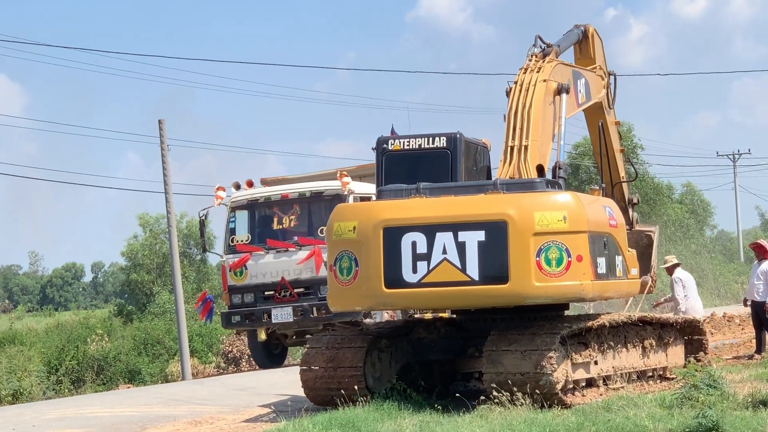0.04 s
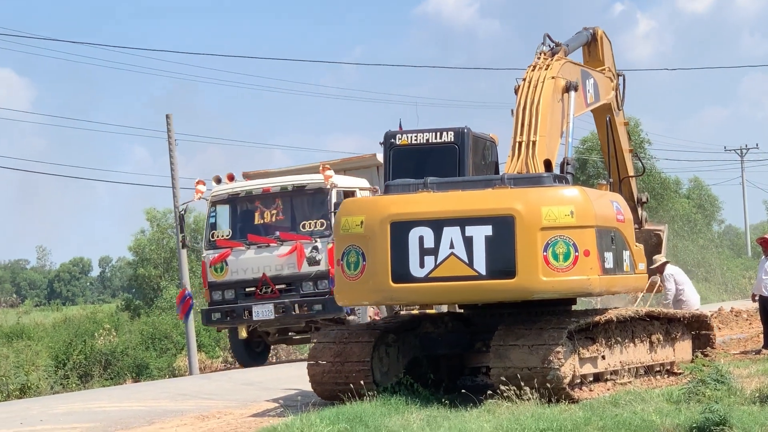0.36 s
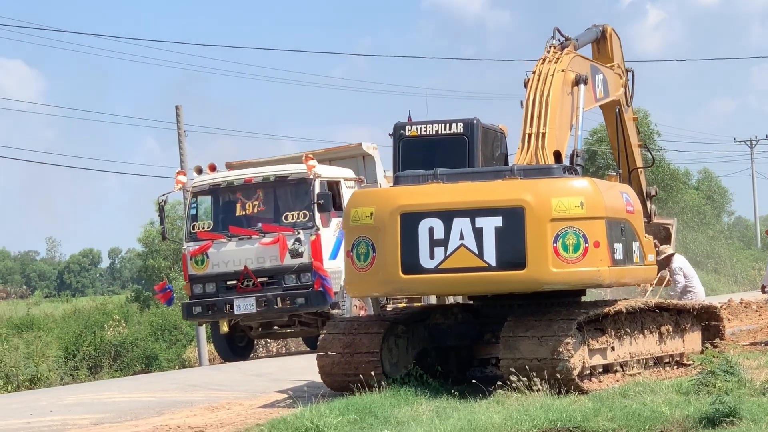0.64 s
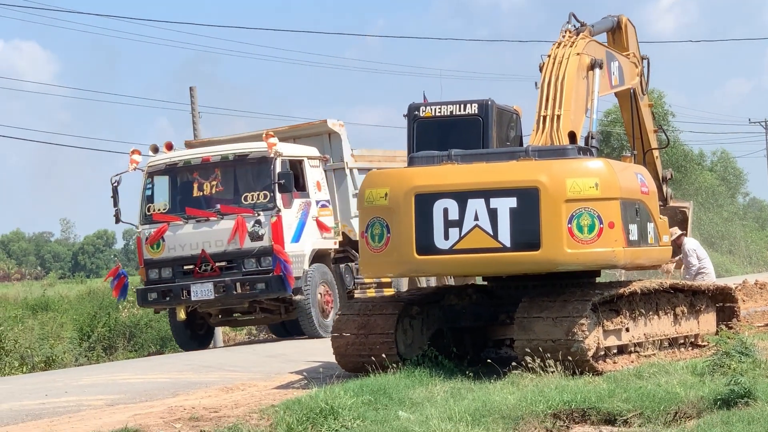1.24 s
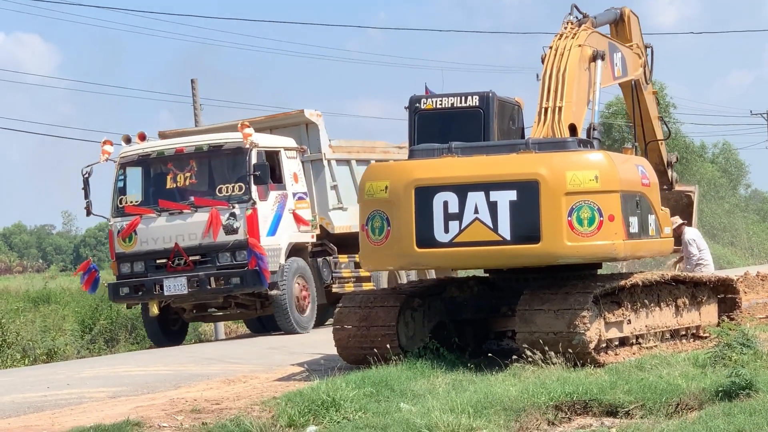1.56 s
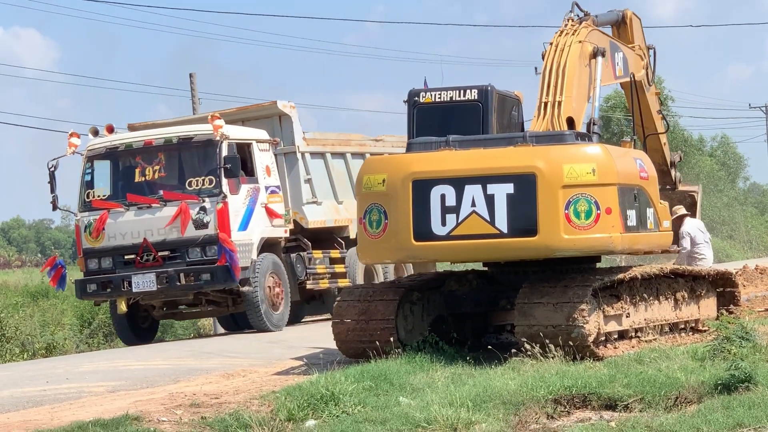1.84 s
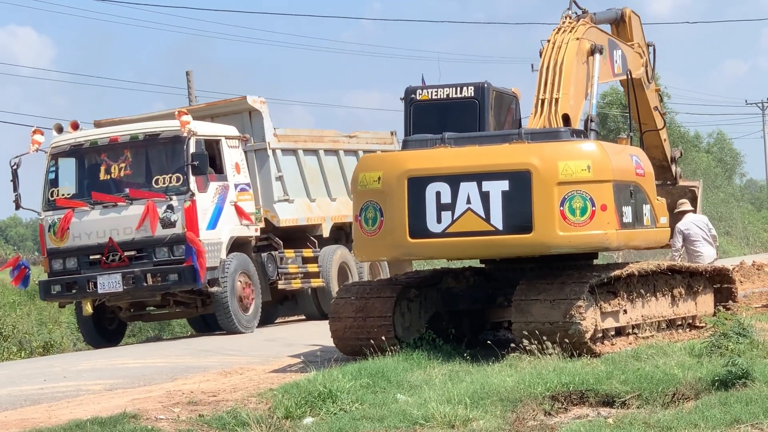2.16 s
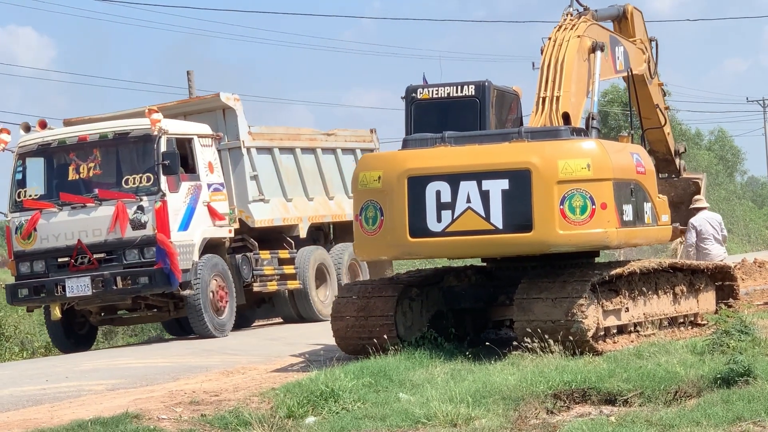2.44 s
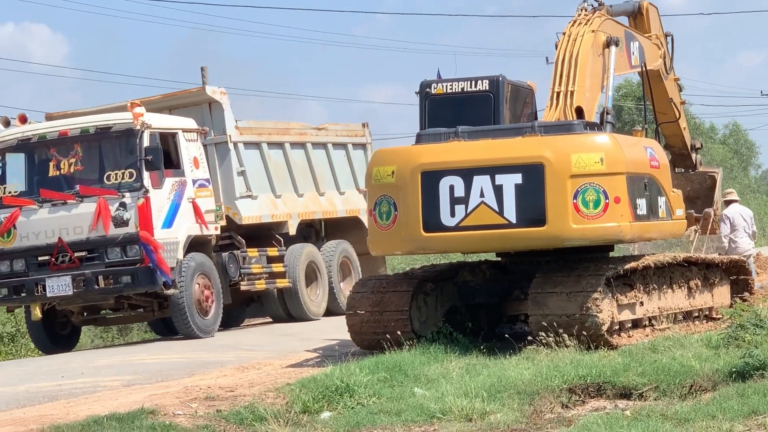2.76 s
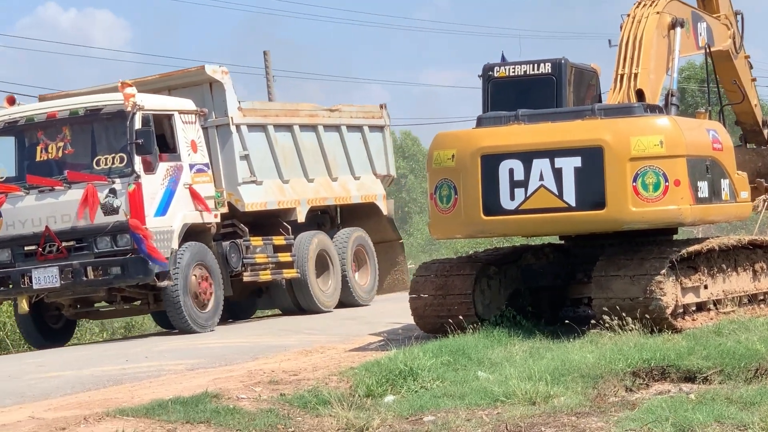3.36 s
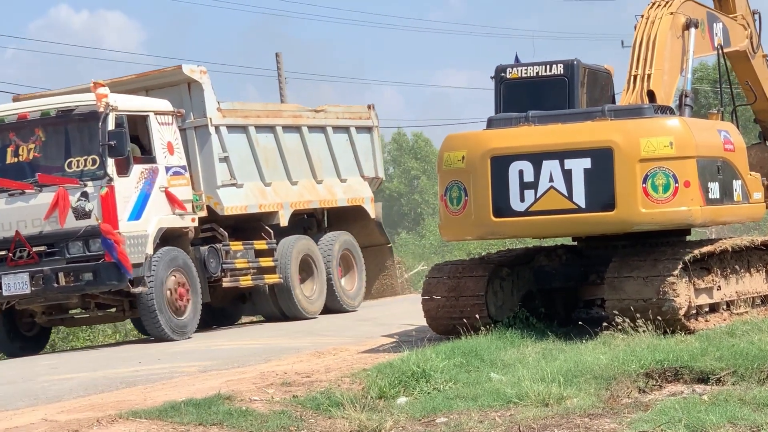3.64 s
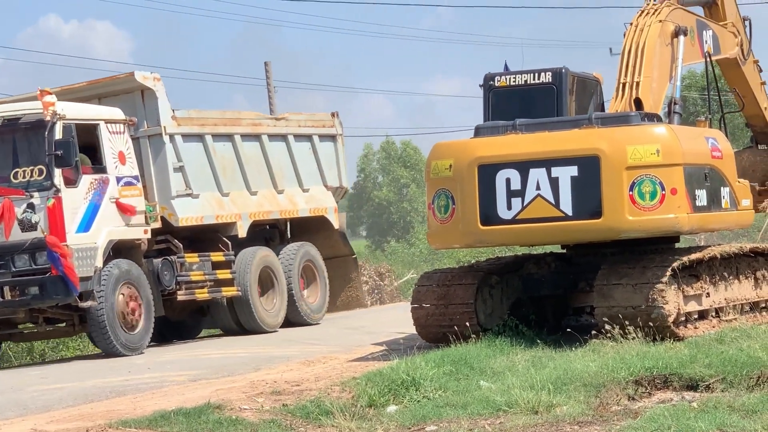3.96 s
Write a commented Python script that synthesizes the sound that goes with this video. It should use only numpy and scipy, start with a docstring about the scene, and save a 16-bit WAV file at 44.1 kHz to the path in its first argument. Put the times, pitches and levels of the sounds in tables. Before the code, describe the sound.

Diesel engines of an excavator and dump truck drone and rumble under a high warbling squeal.

```python
"""A diesel drone and a deep truck rumble come first, with a high, hissy squeal warbling over them.
Two microphones stand by a country road, where an excavator runs at steady revs: its firings drone,
its block clatters, its gears and hydraulics whine. A dump truck crawls along, exhaust puffing and
tyres hissing, and its empty body thumps and rattles. The squeal is probably a dry drive belt."""
import sys
import numpy as np
from scipy import signal
from scipy.fft import rfft, irfft
from scipy.io import wavfile
from scipy.ndimage import uniform_filter1d

SR = 44100
rng = np.random.default_rng(int(sys.argv[2]) if len(sys.argv) > 2 else 0)


def inscribe(sig):
    """Save sig as 16-bit PCM at rate SR to the path in sys.argv[1].

    A 1-D sig is mono; a 2-D sig holds one channel per row.
    Samples are clipped to [-1, 1] before scaling.
    """
    pcm = np.round(np.clip(np.atleast_2d(sig).T, -1, 1) * 32767)
    wavfile.write(sys.argv[1], SR, pcm.astype(np.int16))


N = 176400

# The microphone pair. Each row: frequency in Hz, likeness of the two sides from 0 to 1,
# left over right in dB, left phase lead in radians.
MIC_PAIR = [(30, .75, 4, .3), (60, 0.68, -4.5, 0.2), (120, 0.89, 0, -0.54), (300, 0.89, 0.5, -0.1),
            (497, 0.88, -4.5, 0.54), (665, 0.7, 3.5, -0.2), (790, 0.2, 1, -0.5), (1025, 0.95, -2, -0.23),
            (1320, 1, 0.5, 1.43), (1460, 0.79, 4, 0.47), (1670, 1, -1.2, -0.5), (1953, .9, -0.5, 1),
            (2000, 0.34, 3, 4), (2104, 0.8, 2.5, -0.45), (2430, 0.92, 2, 1.37), (2660, 0.55, -7, 0.1),
            (3050, 0.46, 2, 1.5), (3245, 1, 2.5, 2.5), (3580, 0.26, -2, -0.5), (4500, 0.6, -0.5, 1),
            (4900, 0.8, -5, 0.1), (4980, 0.78, -0.5, 2.5), (6350, 1, -3, 0.65), (7700, 0.48, 3, 4),
            (8180, 0.76, -1, 4), (9800, 0.2, 3.5, 0), (10750, 1, -9, -1), (11750, 1, 1.5, -4),
            (15800, 0.74, -1, 5.5)]

# Excavator revs. Each row: time in seconds, firings per second.
FIRING_RATE = [(0, 88.4), (.7, 91.2), (1.5, 89.7), (2.2, 91), (2.9, 88.3), (3.5, 86.6), (4, 95)]
# Its exhaust tones. Each row: multiple of the crank rate, level in dB against the drone level.
CRANK_ORDERS = [(3, 0), (5, -14), (6, -13), (7, -14), (9, -16.5)]
# Levels of drone, timing gears and block. Each row: time in seconds, level in dB.
DRONE_LEVEL = [(0, -34), (.17, -22.5), (.34, -33), (.4, -27.5), (.68, -31.5), (.85, -29), (1.04, -24.5),
               (1.1, -29.5), (1.28, -22.5), (1.36, -34), (1.46, -27.5), (1.65, -27.5), (1.75, -34),
               (1.82, -27), (1.92, -33), (2.05, -25.5), (2.15, -33), (2.3, -28), (2.38, -22.5),
               (2.46, -30.5), (2.54, -26), (2.63, -28.5), (2.9, -27.5), (3.03, -20.5), (3.1, -29.5),
               (3.47, -24), (3.6, -30), (3.8, -26), (4, -33.5)]
GEAR_LEVEL = [(0, -46), (.5, -43.5), (1, -43), (1.4, -42.5), (1.9, -46), (2.6, -45), (4, -45)]
BLOCK_LEVEL = [(0, -41), (.7, -41), (1.4, -39), (2, -40), (4, -40.5)]
# Ring of the engine block. Each row: frequency in Hz, relative level in dB.
BLOCK_COLOUR = [(900, -24.5), (1380, -27), (1480, 1.5), (1540, -5.5), (1630, 2), (1700, -2.5), (1770, -3),
                (1830, 0.5), (1900, -2.5), (1980, -14), (2600, -17), (5000, -33)]
# Hydraulic tones. Each row: pitch in Hz, level in dB at start, middle and end, left over right in dB.
HYDRAULIC_TONES = [(248.7, -40, -35, -36, -2), (497.4, -46, -44, -44.5, -2), (625, -50, -48.5, -50, 0),
                   (746, -61, -56, -54, 8), (798, -48.5, -57, -62, 5)]

# The truck's exhaust rumble, its deepest chug, its fan and gears, and its tyres.
# Each row: frequency in Hz, relative level in dB.
RUMBLE_COLOUR = [(15, -50), (34, -15), (50, -15), (68, -1), (87, -4.5), (112, -1.5), (135, -6), (210, -7.5),
                 (240, -10), (270, -10), (310, -19), (360, -27.5), (600, -45), (1500, -76)]
CHUG_COLOUR = [(15, -52), (25, -29), (36, -17), (48, 6.5), (66, 6.5), (85, 0.5), (130, -33), (400, -90)]
FAN_COLOUR = [(100, -8.5), (340, -4.5), (400, -1), (480, 6), (555, 0.5), (620, 5), (700, -1), (850, -2.5),
              (1000, 1), (1300, -4.5), (1600, -2.5), (2050, -6.5), (2600, -9.5), (3200, -11), (4400, -15.5),
              (5300, -18), (6400, -15), (7500, -7), (10000, -14.5), (11500, -23.5), (13500, -20),
              (16000, -21.5)]
TYRE_COLOUR = [(1500, -19), (2300, -4.5), (3200, -1), (4400, -3), (5300, -9.5), (6400, -5), (8000, -6.5),
               (12000, -23)]
# How loud those four are at the roadside. Each row: time in seconds, level in dB.
RUMBLE_LEVEL = [(0, -27.5), (.24, -30), (.32, -26), (.55, -28), (.87, -26), (1, -32), (1.3, -25),
                (1.52, -24.5), (1.66, -28.5), (2.5, -27.5), (2.95, -30), (3.18, -27.5), (3.4, -29.5),
                (4, -27.5)]
CHUG_LEVEL = [(0, -36), (.3, -31.5), (.6, -28), (1.05, -42), (1.5, -35), (1.75, -31), (2.05, -29.5),
              (2.35, -38), (3.2, -29.5), (3.7, -39), (4, -54)]
FAN_LEVEL = [(0, -34.5), (1.3, -34.5), (2.3, -33.5), (3, -34.5), (4, -34)]
TYRE_LEVEL = [(0, -53), (.8, -50.5), (1.3, -45.5), (1.75, -51.5), (2.3, -46), (3, -47), (3.4, -51.5),
              (3.7, -47.5), (4, -51)]

# Resting pitch of the belt squeal. Each row: time in seconds, pitch in Hz.
SQUEAL_REST = [(0, 7850.5), (.6, 7839.5), (1.2, 7730.5), (1.6, 7799.5), (1.9, 7690), (2.2, 7660),
               (2.5, 7990), (2.8, 7990), (3.3, 7780.5), (3.7, 7599), (4, 7623.5)]
# Its loudness. Each row: time in seconds, level in dB.
SQUEAL_LEVEL = [(0, -45), (.5, -43.5), (1, -43), (1.7, -49.5), (2.1, -39), (2.6, -42.5), (3, -45),
                (3.5, -38.5), (4, -41)]
# Pulley resonances. Each row: frequency in Hz, width in Hz, relative level in dB.
PULLEY_MODES = [(7602, 45, -1.5), (7790, 90, -6), (8032, 40, 5), (8145, 45, 1), (8630, 50, 6)]
# Echo colouring the squeal at each microphone. Each row: frequency in Hz, left and right gain in dB.
SQUEAL_ECHO = [(7420, 10.5, 2), (8000, 2.5, 1), (8000, -7, -2.5), (8030, -1, 3.5), (8500, -4, 6.5),
               (8500, -4, 0)]
# Rubbing hiss of the belt. Each row: frequency in Hz, relative level in dB.
RUB_COLOUR = [(6000, -35), (7200, -31), (7550, -4), (7850, 5.5), (8100, 5.5), (8550, 2.5), (9000, -8),
              (9600, -25), (11000, -39)]

# Jolts of the truck body. Each row: start in seconds, level in dB, final pitch in Hz, decay in seconds.
BODY_THUMPS = [(.378, -21, 55, .02), (.668, -10.5, 72, .012), (.748, -19.5, 50, .022),
               (.866, -20, 170, .018), (.895, -19.5, 60, .014), (1.466, -17, 88, .014),
               (1.879, -13, 80, .019), (2.162, -14, 72, .016), (2.666, -16.5, 85, .016),
               (3.282, -18, 62, .017), (3.682, -15.5, 56, .012)]
# Body rattles, bright clanks of loose steel, dull chassis clunks and one faint tick.
# Each row: start in seconds, length in seconds, level in dB.
BODY_RATTLES = [(1.303, .026, -32), (1.372, .066, -29), (1.462, .026, -32), (1.732, .048, -29.5)]
STEEL_CLANKS = [(1.125, .03, -43), (1.302, .026, -32.5), (2.145, .022, -39), (3.56, .025, -41)]
CHASSIS_CLUNKS = [(.305, .04, -27), (.42, .025, -31), (.645, .04, -26), (.845, .04, -28.5),
                  (1.335, .035, -26), (1.465, .03, -27), (1.87, .022, -29)]
FAINT_TICK = [(2.293, .024, -46)]
# Colours of those four. Each row: frequency in Hz, relative level in dB.
RATTLE_COLOUR = [(120, -8), (250, 12), (400, 6), (650, 9), (950, 10.5), (1150, 4), (1350, -3), (1700, 6),
                 (2300, -14), (3800, -20), (8000, -35), (15000, -60)]
CLANK_COLOUR = [(400, -9), (1100, 2), (1400, -5), (1700, 5), (2200, -4), (3000, -7), (3800, -7),
                (5000, -27), (12000, -35)]
CLUNK_COLOUR = [(100, -7), (170, 6.5), (290, 0.5), (350, -6.5), (430, -11), (520, -18), (900, -27),
                (3000, -55)]
TICK_COLOUR = [(3500, -26), (5200, -4), (7000, -20), (11500, -14), (13000, 0), (14500, 0), (16000, -12.5)]

TIME, BIN_HZ = np.arange(N) / SR, np.arange(N // 2 + 1) * SR / N


def undb(db):
    """Decibels to gain."""
    return 10 ** (np.asarray(db) / 20)


def unit(x):
    """Scale to rms 1."""
    return x / np.sqrt(np.mean(x ** 2))


def curve(rows):
    """Join (seconds, value) rows by straight lines."""
    return np.interp(TIME, *np.array(rows, float).T)


def across(rows, column=1):
    """One column of a (Hz, ..) table at every frequency bin."""
    rows = np.array(rows, float)
    return np.interp(np.log(BIN_HZ + 1), np.log(rows[:, 0]), rows[:, column])


def colour(x, rows):
    """Filter by (Hz, dB) points; rms 1."""
    return unit(irfft(rfft(x) * undb(across(rows)), N))


def ring(x, modes, bypass_db):
    """Pass through (Hz, width in Hz, dB) resonances; rms 1."""
    resonance = sum(undb(db) / (1 + 2j * (BIN_HZ - hz) / width) for hz, width, db in modes)
    return unit(irfft(rfft(x) * (undb(bypass_db) + resonance), N))


def drift(rate_hz):
    """Smooth random wander; rms 1."""
    hold = max(int(SR / rate_hz), 2)
    steps = np.repeat(rng.standard_normal(N // hold + 2), hold)
    return unit(uniform_filter1d(uniform_filter1d(steps, hold), hold)[:N])


def phase_of(hz):
    """Phase in radians of a moving frequency."""
    return 2 * np.pi * np.cumsum(hz) / SR


def tone(phase):
    """A sine of rms 1 that starts anywhere in its cycle."""
    return np.sqrt(2) * np.sin(phase + rng.uniform(0, 2 * np.pi))


def pan(left_over_right_db):
    """Left and right gains."""
    return undb(np.array([[left_over_right_db], [-left_over_right_db]]) / 2)


def noise():
    """Two unrelated noises: direct sound and scattered sound."""
    return rng.standard_normal((2, N))


def puffs(phase, decay_periods, scatter_db):
    """A decaying burst per firing, each of its own strength."""
    cycles = phase / (2 * np.pi)
    strength = undb(scatter_db * np.clip(rng.standard_normal(N), -2, 2))[cycles.astype(int)]
    return unit(strength * np.exp(-(cycles % 1) / decay_periods))


def swells(rows):
    """A short rise and fall for each (start, length, dB) row."""
    return sum(undb(db) * np.sin(np.pi * np.clip((TIME - start) / length, 0, 1))
               for start, length, db in rows)


def microphones(pair):
    """Direct and scattered sound as they reach the two microphones over the ground."""
    likeness = np.clip(across(MIC_PAIR, column=1), 0, .995)
    lean = undb(across(MIC_PAIR, column=2) / 2) * np.exp(.5j * across(MIC_PAIR, column=3))
    mid, side = rfft(pair) * np.sqrt([(1 + likeness) / 2, (1 - likeness) / 2])
    return irfft(np.array([(mid + side) * lean, (mid - side) / lean]), N)


def excavator():
    """Crank orders drone from the exhaust, each firing knocks the block, and the timing gears whine."""
    firings_per_turn, gear_teeth = 3, 57
    firing = phase_of(curve(FIRING_RATE) * (1 + .0041 * drift(12)))
    crank = firing / firings_per_turn
    orders = sum(undb(db + .91 * drift(14)) * tone(order * crank) for order, db in CRANK_ORDERS)
    drone = orders * undb(curve(DRONE_LEVEL)) * pan(-.44)
    accent = 1 + .5 * np.sin(firing / 2)  # every second knock is harder
    knocks = puffs(firing, decay_periods=1, scatter_db=.5) * accent
    tooth_hz = curve(FIRING_RATE) / firings_per_turn * gear_teeth * (1 + .018 * drift(110))
    whine = np.sqrt(2) * np.sin(phase_of(tooth_hz)) * undb(curve(GEAR_LEVEL) + 2.1 * drift(45))
    direct_whine = np.array([whine, np.zeros(N)])
    clatter = colour(noise() * (knocks + .8), BLOCK_COLOUR) * undb(curve(BLOCK_LEVEL))
    return drone + microphones(clatter + direct_whine)


def hydraulics():
    """Pump and gear tones waver together, each at its own place between the microphones."""
    speed = 1 + .0012 * drift(5.945) + .0033 * drift(50.17)
    whine = 0
    for hz, first, middle, last, side_db in HYDRAULIC_TONES:
        level_db = curve([(0, first), (N / SR / 2, middle), (N / SR, last)]) + 1.8 * drift(12)
        whine += undb(level_db) * tone(phase_of(hz * speed)) * pan(side_db)
    return whine


def truck():
    """Out on the road, ragged exhaust puffs rumble over a surging chug; fan and gears throb; tyres hiss."""
    firing_hz, pulse_share, surge_db = 134, .47, 2
    firing = phase_of(firing_hz * (1 + .012 * drift(4)))
    pulses = puffs(firing, decay_periods=.83, scatter_db=4)
    throb = 1 - pulse_share + pulse_share * pulses
    rumble = colour(noise() * throb, RUMBLE_COLOUR) * undb(curve(RUMBLE_LEVEL))
    chug = colour(noise() * undb(surge_db * drift(12)), CHUG_COLOUR) * undb(curve(CHUG_LEVEL))
    fan = colour(noise() * (1 + .22 * pulses), FAN_COLOUR)
    fan *= undb(curve(FAN_LEVEL) + .44 * drift(25.13))
    tyres = colour(noise(), TYRE_COLOUR) * undb(curve(TYRE_LEVEL) + 2.2 * drift(8.88))
    return microphones(rumble + chug + fan + tyres)


def belt():
    """A rough squeal climbs once a belt turn and rings the pulley, over a steady rubbing hiss."""
    turn_s, crest_at_s, crest_hz, sharpness = .1334, .095, 8170, 1.2
    roughness_hz, hiss_db = 500, -37
    crest = np.exp(sharpness * (np.cos(2 * np.pi * (TIME - crest_at_s) / turn_s) - 1))
    rest_hz = curve(SQUEAL_REST)
    pitch_hz = rest_hz + (crest_hz - rest_hz) * crest + 85 * drift(45)
    # Each microphone gets its own grain, which spreads the tone into a narrow band.
    grain = np.array([drift(roughness_hz) + 1j * drift(roughness_hz) for _ in range(2)])
    rough_tone = np.real(grain * np.exp(1j * phase_of(pitch_hz)))
    squeal = ring(rough_tone, PULLEY_MODES, bypass_db=-12)
    squeal *= undb(curve(SQUEAL_LEVEL) + 2.2 * drift(30.16))
    echo_gain = undb([across(SQUEAL_ECHO, column=1), across(SQUEAL_ECHO, column=2)])
    hiss = microphones(colour(noise(), RUB_COLOUR)) * undb(hiss_db + drift(20))
    return irfft(rfft(squeal) * echo_gain, N) + hiss * pan(-5)


def truck_rattles():
    """The chassis clunks, loose steel clanks, the body rattles and ticks once: short bursts of noise."""
    rattle = swells(BODY_RATTLES) * colour(noise() * undb(3.11 * drift(250)), RATTLE_COLOUR)
    clank = swells(STEEL_CLANKS) * colour(noise() * undb(3.4 * drift(300)), CLANK_COLOUR)
    clunk = swells(CHASSIS_CLUNKS) * colour(noise(), CLUNK_COLOUR)
    tick = swells(FAINT_TICK) * colour(noise(), TICK_COLOUR)
    return microphones(rattle + clank + clunk + tick)


def truck_thumps():
    """The empty tipper booms with a falling pitch at each jolt, alike in both microphones."""
    attack_s, start_hz, fall_s, lowest_radiated_hz = .011, 197, .008, 28
    boom = 0
    for start, db, final_hz, decay_s in BODY_THUMPS:
        age = np.maximum(TIME - start, 0)
        envelope = np.minimum(age / attack_s, 1) * np.exp(-np.maximum(age - attack_s, 0) / decay_s)
        cycles = final_hz * age + (start_hz - final_hz) * fall_s * (1 - np.exp(-age / fall_s))
        boom -= undb(db) * envelope * np.sin(2 * np.pi * cycles)
    low_cut = signal.butter(2, lowest_radiated_hz, "highpass", fs=SR, output="sos")
    return signal.sosfilt(low_cut, boom)


def scene():
    """Both machines side by side, heard from the roadside."""
    return excavator() + hydraulics() + belt() + truck() + truck_rattles() + truck_thumps()


def record(dry):
    """The recorder cuts the top treble steeply."""
    top_hz = 15600
    return signal.sosfilt(signal.ellip(10, .2, 80, top_hz, fs=SR, output="sos"), dry)


dry = scene()
out = record(dry)
inscribe(out)
```